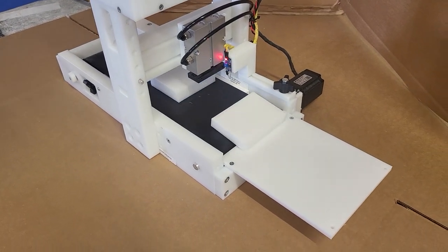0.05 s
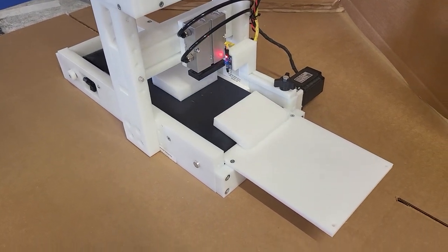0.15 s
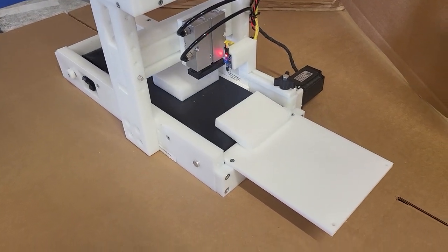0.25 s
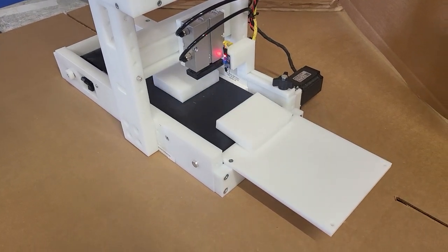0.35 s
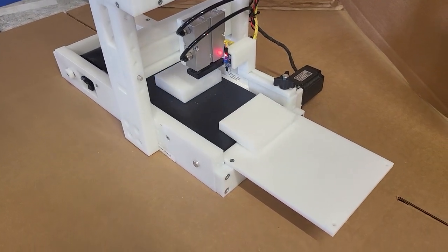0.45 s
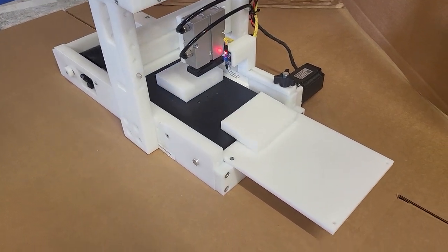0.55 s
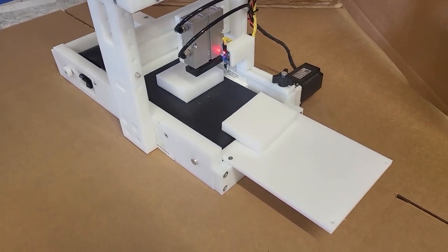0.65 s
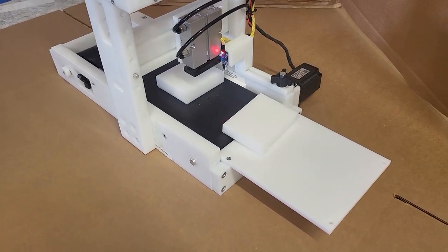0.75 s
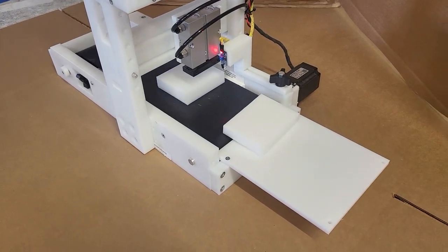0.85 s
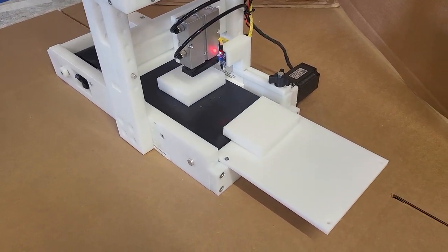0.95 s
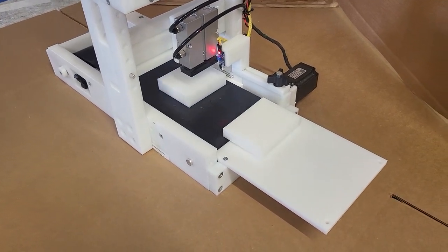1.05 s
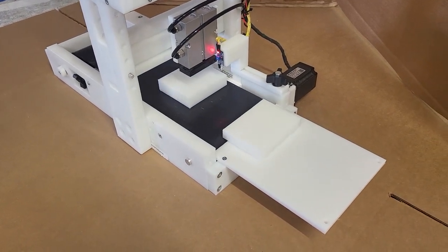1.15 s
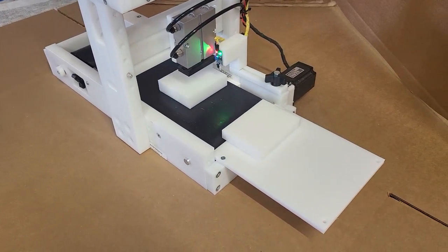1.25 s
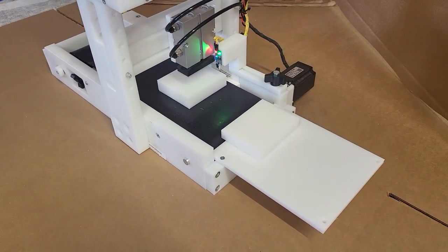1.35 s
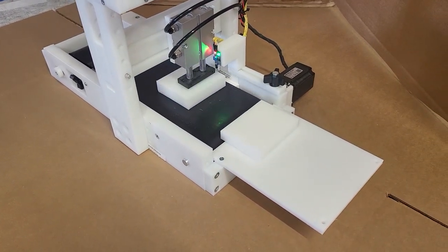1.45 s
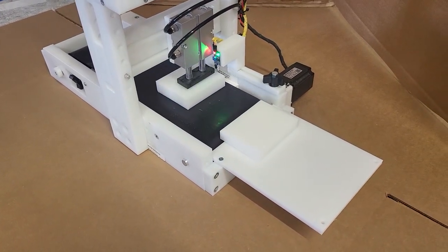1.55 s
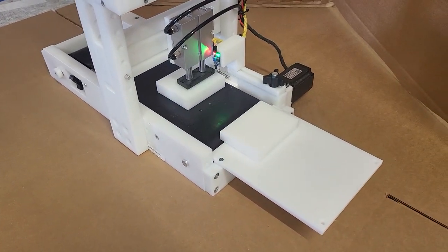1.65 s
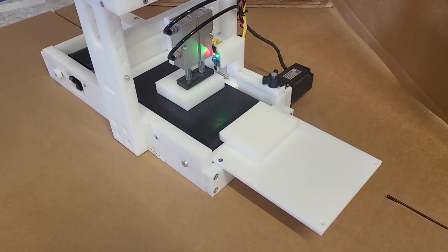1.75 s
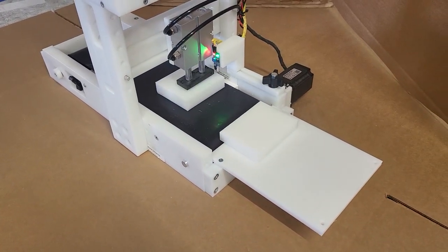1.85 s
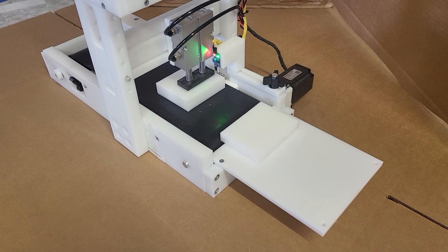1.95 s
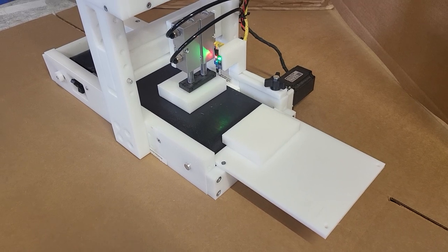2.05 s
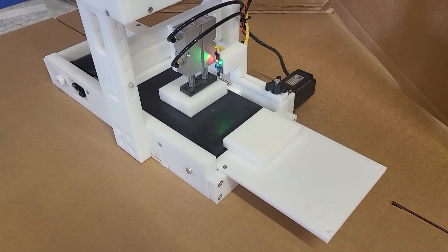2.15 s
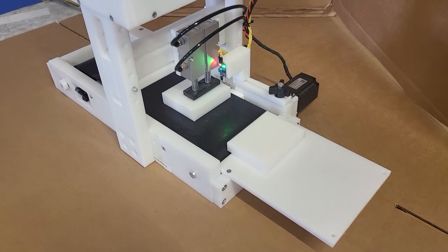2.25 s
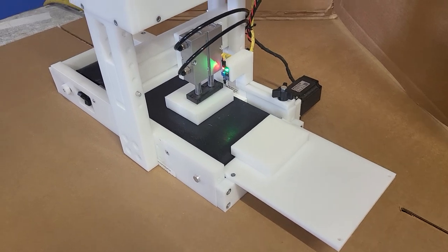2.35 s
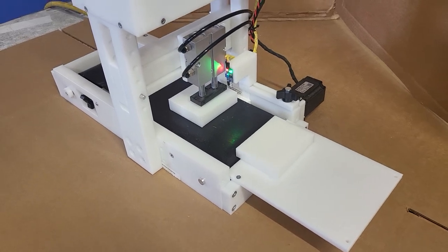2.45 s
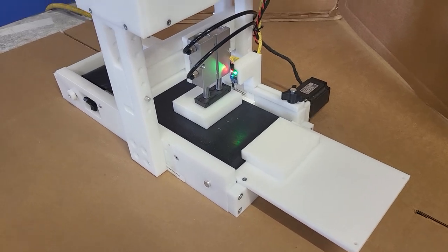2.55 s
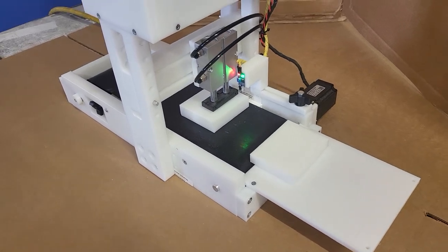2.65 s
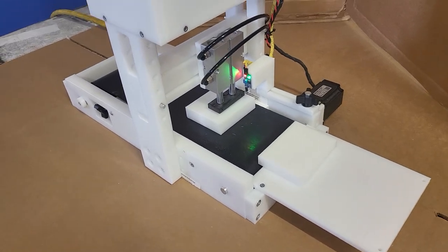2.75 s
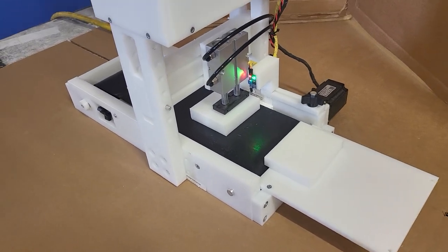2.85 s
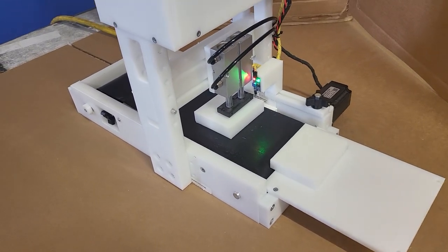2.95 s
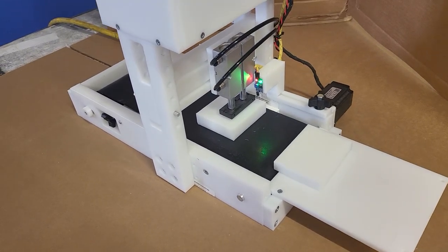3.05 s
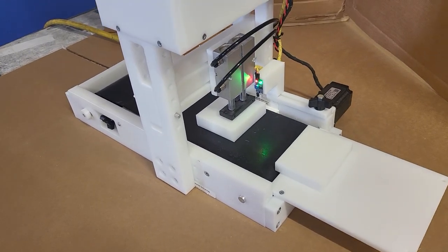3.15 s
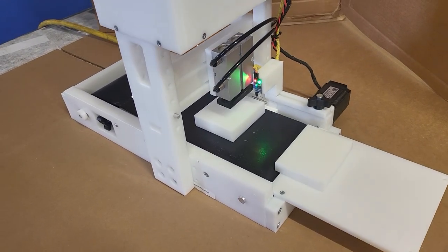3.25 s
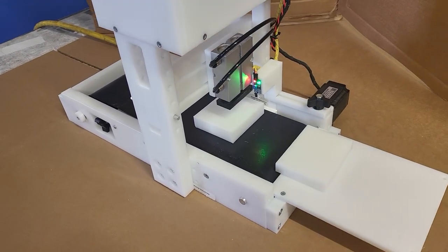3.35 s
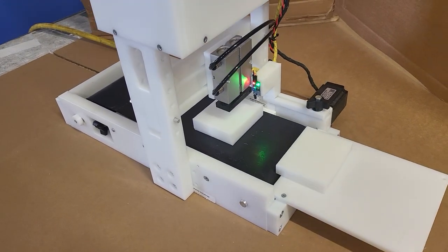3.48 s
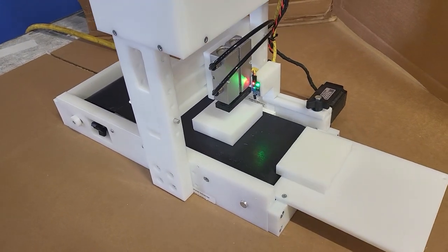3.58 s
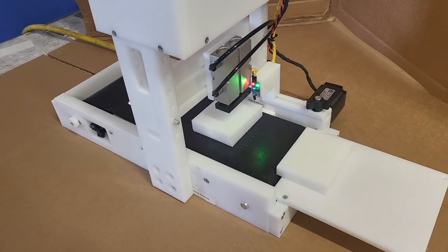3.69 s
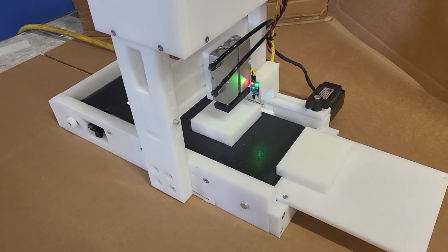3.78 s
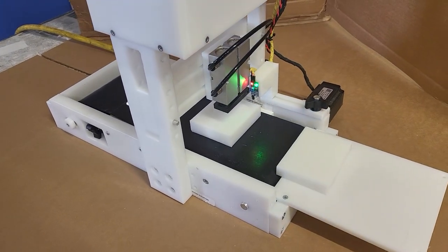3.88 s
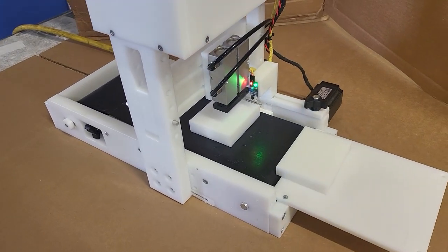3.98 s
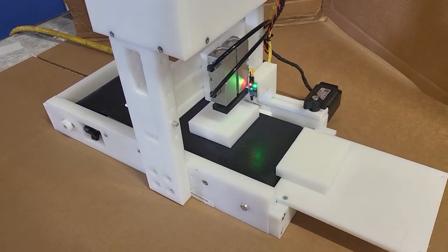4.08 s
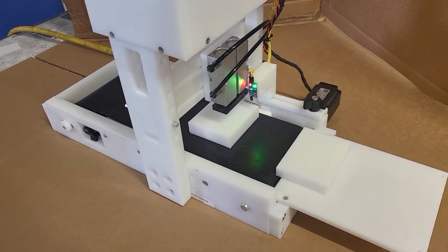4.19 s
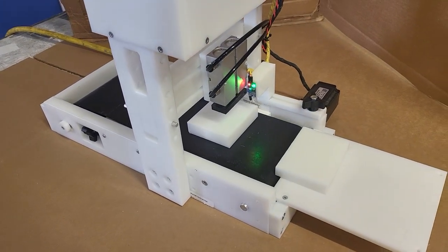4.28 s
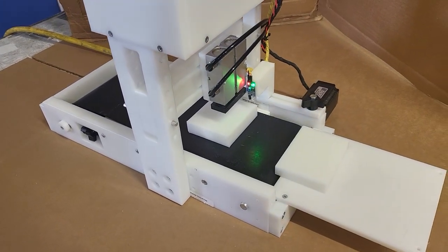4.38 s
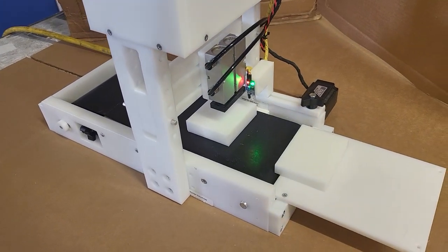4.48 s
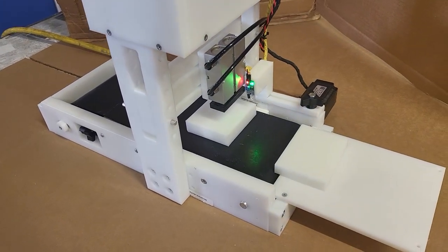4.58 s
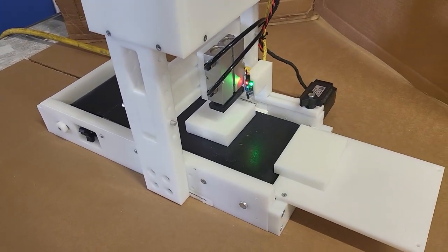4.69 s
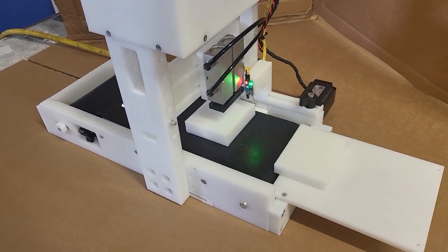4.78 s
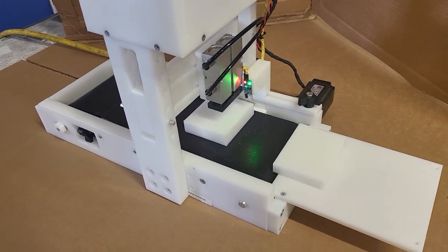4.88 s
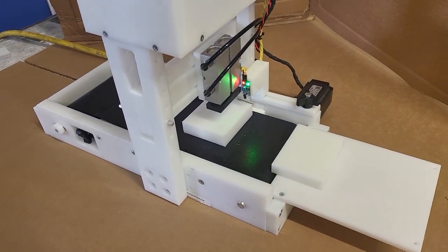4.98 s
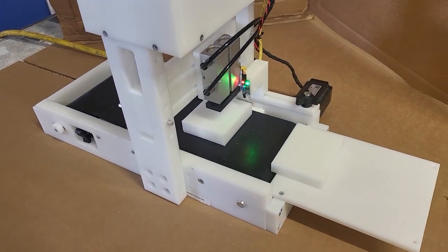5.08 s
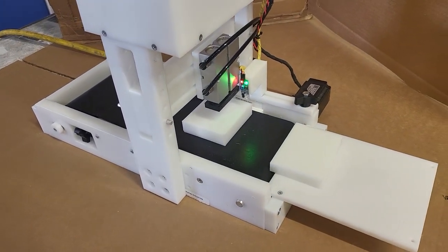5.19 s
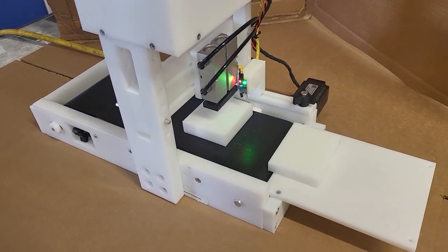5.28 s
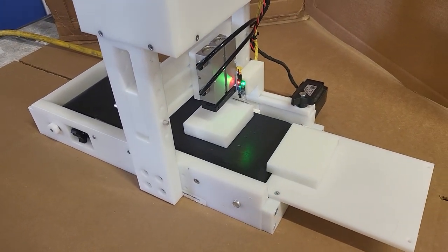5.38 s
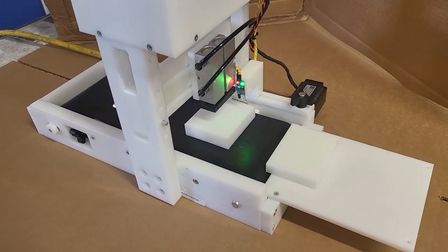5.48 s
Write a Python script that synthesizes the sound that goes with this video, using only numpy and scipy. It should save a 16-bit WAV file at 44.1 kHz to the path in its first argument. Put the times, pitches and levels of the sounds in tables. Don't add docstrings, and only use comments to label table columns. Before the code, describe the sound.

Stereo, close and handheld, in a workshop with a short, light echo. Throughout, a leaking air fitting gives a steady, bright hiss, its whistly colour and side shifting slightly as the microphone moves, above a quiet low wash and mains hum. At 0 s a plastic block drops and settles in a rapid knock-rattle lasting about a tenth of a second. A small belt motor whirs, fuzzy and low-pitched, from 0.05 to 1.2 s, then cuts off. At 1.37 s the cylinder strokes down: valve click, a sharp burst of exhaust air, and a tight cluster of heavy thumps and hard clacks, gone in about 0.15 s. Faint plastic taps follow near 1.8, 2.15 and 2.5 s. At 3.18 s the upstroke fires: a clack, a slightly longer, thinner puff, then a second clack with a short metallic ring at 3.26 s. Only hiss and hum remain until 5.1 s, when the motor resumes, softer, to the end.

```python
import sys
import numpy as np
from scipy import signal
from scipy.fft import rfft, irfft, next_fast_len
from scipy.io import wavfile
from scipy.ndimage import uniform_filter1d

SR = 44100
rng = np.random.default_rng(int(sys.argv[2]) if len(sys.argv) > 2 else 0)


def bounce(signal):
    frames = np.transpose(np.atleast_2d(signal))
    limited = np.clip(frames, -1, 1)
    pcm = np.round(limited * 32767).astype(np.int16)
    wavfile.write(sys.argv[1], SR, pcm)


def invert_db(level):
    return 10 ** (np.asarray(level, dtype=float) / 20)


N = 243866


def evened(x):
    return x / np.sqrt(np.mean(x ** 2) + 1e-20)


def read(points, hz):
    f, value = np.transpose(points)
    return np.interp(np.log(hz + 1), np.log(f + 1), value)


def sides(db):
    return invert_db(np.array([db / 2, -db / 2]))


def add(mix, s, sound):
    part = mix[:, round(s * SR):][:, :sound.shape[1]]
    part += sound[:, :part.shape[1]]


def paths(frames):
    chance = rng.standard_normal((frames, 257)).T
    slow = uniform_filter1d(chance, 600, 1)
    return 1.43 + 1.8 * evened(uniform_filter1d(slow, 4, 0))


def noise(db, lean_db, same, turn, length):
    a, b, c, d = rng.standard_normal((length // 128 + 5, 257, 4)).T
    left, other = a + 1j * b, c + 1j * d
    right = same * np.exp(1j * turn) * left + np.sqrt(1 - same ** 2) * other
    z = np.array([left, right]) * invert_db(db) * sides(lean_db)
    return evened(signal.istft(z, nperseg=512, noverlap=384)[1][:, :length])


def tone(hz, width, length):
    coarse = next_fast_len(N // 32 + 1)
    a, b = rng.standard_normal((coarse, 2, 2)).T
    z = np.fft.fft(a + 1j * b)
    offset_hz = np.fft.fftfreq(coarse, 32 / SR)
    z = np.fft.ifft((z + 0.22 * z[::-1]) / (1 + (2 * offset_hz / width) ** 2))
    share = np.clip(width / 18, 0, 1)
    blur = np.repeat(1 - share + share * z / np.std(z), 32, axis=1)[:, :length]
    turn = 2 * np.pi * (np.cumsum(hz * np.ones(length)) / SR + rng.random())
    return evened(blur.real * np.cos(turn) + blur.imag * np.sin(turn))


def ring(modes, db, damping, detune=0.046):
    hz, mode_db, t60 = np.transpose(modes)[:, None, :, None]
    t = np.arange(int(SR * t60.max() / damping)) / SR
    chance = rng.standard_normal((3, 2, len(modes), 1)) * np.clip(hz / 1000, 0, 1)
    swell = 1 - np.exp(-t * hz * 1.72)
    waves = np.sin(2 * np.pi * hz * (1 + detune * chance[2, 0]) * t + chance[1]) * swell
    level_db = mode_db + db + 2.5 * chance[0] - 60 * t * damping / t60
    return (invert_db(level_db) * waves).sum(1)


# frequency in Hz, level in dB per Hz.
AIR_COLOUR = [(12, -29), (25, -7), (60, -10), (105, -1.5), (200, -20.5), (320, -14), (2000, -25),
              (3200, -56)]
# frequency in Hz, likeness from -1 to 1.
AIR_LIKENESS = [(60, 0.92), (130, 0.72), (290, 0.54), (640, -0.47), (1410, -0.28), (3100, -0.32),
                (6820, -0.27), (15000, 0.59)]
# frequency in Hz, level in dB, wavering width in Hz, left minus right in dB.
HUM_TONES = [(120.9, -51.5, 0.52, 0.5), (238, -71.5, 0.83, -0.5), (355, -67.5, 1.8, -9.5),
             (382.7, -64.5, 1.8, 1), (467, -118, 2.7, -4), (497, -73.5, 6.1, 2)]


def shop():
    size = next_fast_len(N)
    hz = np.fft.rfftfreq(size, 1 / SR)
    a, b = rfft(rng.standard_normal((size, 2)).T)
    same = np.clip(read(AIR_LIKENESS, hz), -1, 1)
    pair = np.array([a, same * a + np.sqrt(1 - same ** 2) * b])
    wash = irfft(pair * invert_db(read(AIR_COLOUR, hz)), size)[:, :N]
    hum = sum(invert_db(db) * sides(lean)[:, None] * tone(f, width, N) for f, db, width, lean in HUM_TONES)
    return invert_db(-55) * evened(wash) + hum


# frequency in Hz, level in dB per Hz.
LEAK_COLOUR = [(1060, -44), (1800, -18.5), (3000, -15), (3500, -10), (6500, -7), (8600, -9), (13500, -10.5),
               (16000, -12.5)]
# frequency in Hz, left minus right in dB, its change in dB per unit angle.
LEAK_SIDES = [(1290, 8, 17), (2430, -1, 0), (3800, -5.5, -2.5), (6650, -1, 0.5), (10300, -5.5, 3.5),
              (14500, 0.5, 0), (16000, -2, 9)]
# frequency in Hz, width in Hz, boost in dB,
# its change in dB per unit angle.
MACHINE_HOLLOWS = [(2220, 780, 5.5, -3), (3060, 170, -2, 3.5), (3590, 360, 4, -0.5), (5070, 420, 3.5, 1),
                   (5770, 210, 7, -0.5), (6180, 170, 4.5, 0), (7010, 680, 7.5, -4), (7920, 330, 12.5, -0.5),
                   (10280, 640, 3.5, -2), (11960, 680, 4, -2.5), (14900, 1100, 5.5, 1.5)]
# time in seconds, angle about -1 to 1, path stretch factor,
# leak level in dB.
CAMERA_PATH = [
    (0, -1.1, 0.98, -45.5),
    (1.2, -0.95, 1.02, -43.5),
    (2.2, -0.042, 0.94, -44),
    (2.55, -0.63, 1.005, -44.5),
    (3.1, 0.069, 0.964, -43.5),
    (3.8, 0.45, 0.997, -44),
    (4.6, 1, 0.97, -43.5),
    (5.53, 1, 1, -43.5),
]


def leak():
    hz = np.fft.rfftfreq(512, 1 / SR)[:, None]
    t = np.arange(N // 128 + 5) * 128 / SR
    s, *moves = np.transpose(CAMERA_PATH)
    angle, stretch, level_db = (np.interp(t, s, m) for m in moves)
    colour_db = read(LEAK_COLOUR, hz)
    for f, width, db, swing in MACHINE_HOLLOWS:
        colour_db = colour_db + (db + swing * angle) / (1 + (2 * (hz - f * stretch) / width) ** 2)
    lean = np.array(LEAK_SIDES)
    lean_db = read(lean[:, :2], hz) + read(lean[:, ::2], hz) * angle
    combs = rng.standard_normal((len(t), 257, 2)).T
    combs = [evened(uniform_filter1d(uniform_filter1d(c, 500, 1), 3, 0)) for c in combs]
    hiss = noise(colour_db + 0.54 * combs[0], lean_db + 3.2 * combs[1], 0.66, paths(len(t)), N)
    return invert_db(np.interp(np.arange(N) / SR, t, level_db)) * hiss


# start in seconds, stop in seconds, level in dB.
BELT_RUNS = [
    (.05, 1.187, -1),
    (5.098, 5.6, -5),
]
# frequency in Hz, level in dB, width in Hz, left minus right in dB.
MOTOR_TONES = [(174, -59.5, 17, 2.5), (411, -69.5, 2.9, 7), (644, -60.5, 22, -3), (830, -73.5, 13, -10),
               (1320, -67, 29, -4), (1450, -66, 3.4, -4), (1906, -73, 10.4, 17), (1217, -65.5, 4100, 2)]


def belt():
    spin_up_s, run_down_s, rest_db = 0.1334, 0.067, -3
    out = np.zeros((2, N))
    for start, stop, db in BELT_RUNS:
        t = np.arange(0, stop - start + run_down_s, 1 / SR)
        rest = 1 - np.clip(np.minimum(t / spin_up_s, (t[-1] - t) / run_down_s), 0, 1)
        whine = sum(invert_db(d) * sides(lean)[:, None] * tone(f, w, len(t)) for f, d, w, lean in MOTOR_TONES)
        add(out, start, whine * invert_db(db + rest_db * rest))
    return out


# frequency in Hz, level in dB, t60 in seconds.
BLOCK_MODES = [(206, -6, 0.042), (383, 6, 0.057), (648.5, 0, 0.19), (1075, -3, 0.17), (1092, 1.5, 0.022),
               (1269, 5.5, 0.075), (1480, -4, .03), (1740, -13, 0.1), (2110, -13, .04), (2540, -10, 0.1),
               (3000, -14, 0.039)]
# start in seconds, level in dB, tilt in dB an octave, damping factor,
# left minus right in dB.
BLOCK_KNOCKS = [(.004, -29, 7.5, 1.73, 0), (.022, -35, -1.5, 1.5, -2), (0.034, -56.5, -13.5, 1.9, -8),
                (.044, -43, -12.5, 4.8, -3), (.069, -36.5, 3, 1.7, 0), (.085, -44.5, -2.5, 0.86, 9),
                (0.096, -52.5, -4.5, 1, -24), (0.118, -59, -11.5, 1.14, -4), (1.791, -56, 2, 2.8, -9),
                (2.152, -35, 4.5, 8, 6.5), (2.51, -52, 5, 4.6, 3), (2.561, -55, 3, 4.4, -3),
                (3.47, -69, 4, 2.6, 4)]


def block():
    out = np.zeros((2, N))
    octaves = np.log2(np.array(BLOCK_MODES)[:, 0] / 1000)[:, None]
    for s, db, tilt_db, damping, lean in BLOCK_KNOCKS:
        knock = ring(BLOCK_MODES, db + tilt_db * octaves, damping, detune=0.018)
        add(out, s, sides(lean)[:, None] * knock)
    return out


# valve moves in seconds, pilot air in dB, wait for the port in seconds,
# full flow in dB, flow lasts in seconds.
CYLINDER_STROKES = [
    (1.374, -25, 0.012, -14, 0.049),
    (3.182, -24.5, 0.013, -16, 0.077),
]
# frequency in Hz, level in dB per Hz.
EXHAUST_COLOURS = [
    [(410, -37), (800, -5.5), (1300, -22), (2150, -11.5), (5020, -6), (9600, -2.5), (15900, -1.5),
     (16500, -20)],
    [(410, -36), (700, -26), (1800, -20), (2900, -15), (3470, -8.5), (5800, -6), (15900, -4.5),
     (16500, -33)],
]
# frequency in Hz, left minus right in dB.
EXHAUST_SIDES = [
    [(700, 10), (1290, 1), (2380, -1), (9000, -3.5), (14000, -2)],
    [(700, -7), (1290, 0), (2380, -1), (4400, -5.5), (6500, 5.5), (9000, -1.5), (14000, 1)],
]


def exhaust():
    open_s, shut_s, drain_s, die_s = 0.0021, 0.011, 0.025, 0.053
    pilot_sag_db, flow_sag_db, shut_db, drain_db, die_db = -5.5, -2.5, -19, -22, -51
    out = np.zeros((2, N))
    hz, t = np.fft.rfftfreq(512, 1 / SR)[:, None], np.arange(SR // 4) / SR
    for stroke, colour, lean in zip(CYLINDER_STROKES, EXHAUST_COLOURS, EXHAUST_SIDES):
        start, pilot_db, wait, db, hold = stroke
        s = np.cumsum([0, open_s, wait - open_s, open_s, hold, shut_s, drain_s, die_s])
        pilot = pilot_db + np.array([-30, 0, pilot_sag_db])
        rush = db + np.array([0, flow_sag_db, shut_db, drain_db, die_db])
        flutter = evened(uniform_filter1d(rng.standard_normal(len(t)), 90))
        flow_db = np.interp(t, s, np.r_[pilot, rush], right=-90) + 0.95 * flutter
        air = noise(read(colour, hz), read(lean, hz), 0.24, paths(len(t) // 128 + 5), len(t))
        add(out, start, invert_db(flow_db) * air)
    return out


# frequency in Hz, level in dB, t60 in seconds.
BENCH_MODES = [(52.7, -19, 0.3), (81.3, -1, 0.1), (106.5, -15.5, 0.32)]
FRAME_MODES = [(151, 1, 0.063), (191.2, 1.5, 0.069), (227, -3.5, 0.1), (260.6, -9.5, 0.14),
               (330.2, -13, 0.21), (375, -6, 0.09), (426, -11.5, 0.1)]
HEAD_MODES = [(564, -13, 0.034), (649, -7, 0.098), (724, 2, 0.03), (814, -2, 0.025), (917, -1, 0.018),
              (1007, -0.5, 0.023)]
VALVE_MODES = [(1256, -11, 0.094), (1420, -2.5, 0.032), (1903, -2, 0.03), (2240, 6.5, 0.0084),
               (2746, -1, 0.027), (3550, 2.5, 0.011), (4120, 0, 0.012), (3100, -4, .012)]
ROD_MODES = [(694, -6, .1), (1392, -2.5, 0.085), (1452, -1, 0.11), (2830, -2, .03)]
# start in seconds, dB into bench, dB into frame, damping factor.
PISTON_THUMPS = [(1.386, -47, -18.5, 1.2), (1.404, -8.5, -20, 0.46), (1.416, -38, -27, 1.3),
                 (1.428, -15, -15, 1.2), (1.441, -30, -22.5, 0.79), (1.453, -39, -30, 0.82),
                 (1.465, -15.5, -29, 0.75), (1.478, -28, -27, 1.04), (3.184, -42, -20, 3.9),
                 (3.1973, -52, -13, 1.9), (3.273, -11, -33, 0.9), (3.285, -31, -19.5, 1.6),
                 (3.31, -24, -34, 1.1)]
# start in seconds, dB into head, dB into valve, damping factor.
VALVE_CLACKS = [(1.376, -37.5, -30.5, 0.44), (1.386, -28, -35, 0.94), (1.404, -29, -42, .93),
                (1.4225, -16.5, -15, 1.33), (1.428, -10.5, -15, 2.7), (1.441, -20.5, -27, 0.94),
                (1.465, -37, -37, 0.64), (3.184, -29.5, -26.5, 2.8), (3.1959, -22, -21, 1.5),
                (3.1973, -11.5, -40, 2.04), (3.203, -38, -29, 1.5), (3.261, -16.5, -21.5, 1.24),
                (3.2645, -16, -22, 1), (3.273, -23.5, -30.5, 0.62), (3.285, -37, -40, 2.1)]
# start in seconds, level in dB.
ROD_BLOWS = [
    (3.2635, -21.5),
    (3.277, -28),
]


def blows():
    out = np.zeros((2, N))
    thumps = PISTON_THUMPS, (BENCH_MODES, FRAME_MODES)
    clacks = VALVE_CLACKS, (HEAD_MODES, VALVE_MODES)
    for rows, parts in (thumps, clacks):
        for s, *parts_db, damping in rows:
            for part, db in zip(parts, parts_db):
                add(out, s, ring(part, db, damping))
    for s, db in ROD_BLOWS:
        add(out, s, ring(ROD_MODES, db, 1, detune=0.005))
    return out


# frequency in Hz, t60 in seconds.
ECHO_DECAY = [(100, 0.36), (500, 0.59), (2000, 0.6), (6000, 0.42), (14000, 0.31)]


def room(x):
    taps = np.zeros((2, SR // 2))
    at = np.arange(200, SR // 2 - 20, 20)
    at = at + rng.integers(0, 20, (2, len(at)))
    np.put_along_axis(taps, at, rng.choice([-1., 1.], at.shape), 1)
    hz, t, z = signal.stft(taps, SR, nperseg=256)
    same = 1 / (1 + (hz / 402) ** 2)[:, None]
    z = np.array([z[0], same * z[0] + np.sqrt(1 - same ** 2) * z[1]])
    decay = invert_db(-60 * t / read(ECHO_DECAY, hz)[:, None])
    tail = signal.istft(z * decay, SR, nperseg=256)[1]
    return signal.oaconvolve(x, tail / np.linalg.norm(tail[0]), axes=1)[:, :N]


def scene():
    air, knocks = exhaust(), blows() + block()
    echo = room(invert_db(-15.5) * air + invert_db(-14.0) * knocks)
    return air + knocks + echo + leak() + shop() + belt()


def low_pass(x):
    return signal.sosfilt(signal.butter(12, 15830, fs=SR, output="sos"), x)


def record(dry):
    size = next_fast_len(N)
    hz = np.fft.rfftfreq(size, 1 / SR)
    colour = hz ** 2 / np.sqrt(hz ** 4 + 45.4 ** 4)
    mix = irfft(rfft(dry, size) * colour, size)[:, :N]
    return low_pass(mix)


dry = scene()
out = record(dry)
bounce(out)
```